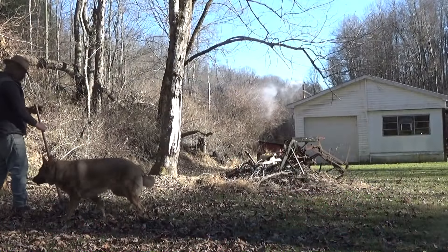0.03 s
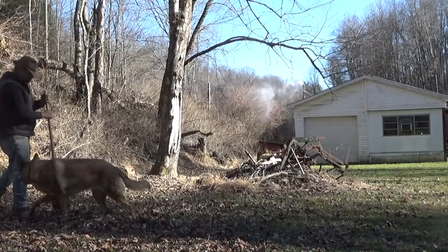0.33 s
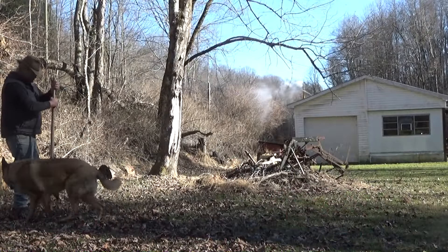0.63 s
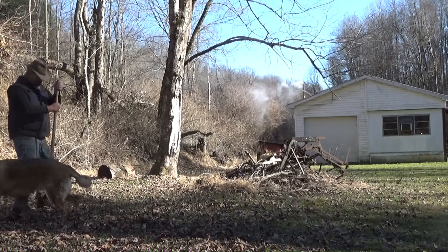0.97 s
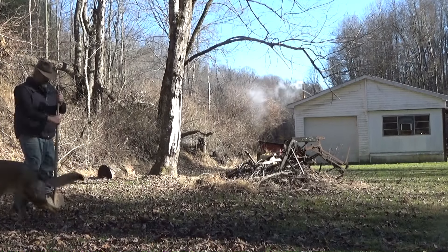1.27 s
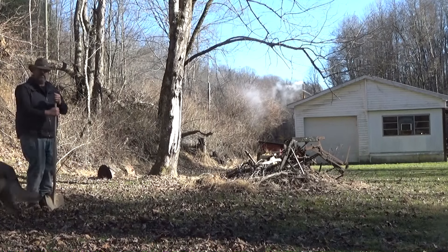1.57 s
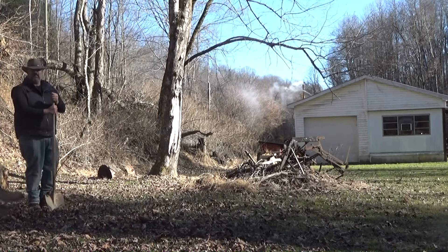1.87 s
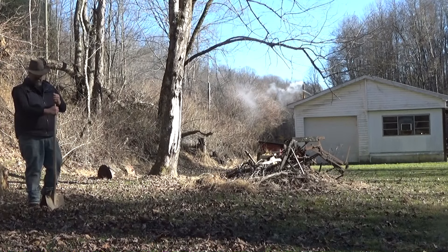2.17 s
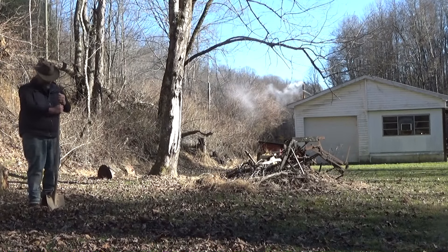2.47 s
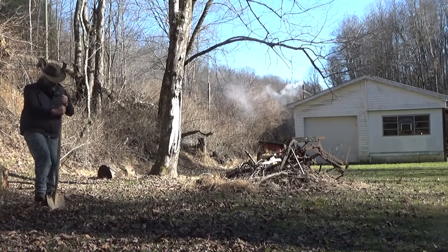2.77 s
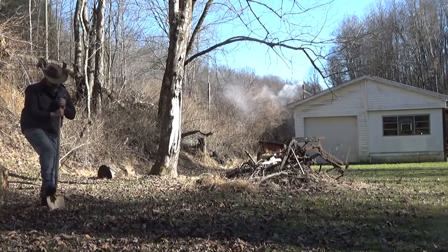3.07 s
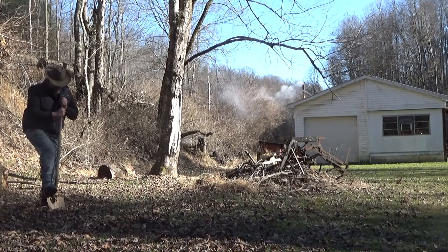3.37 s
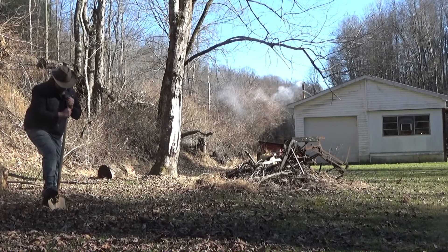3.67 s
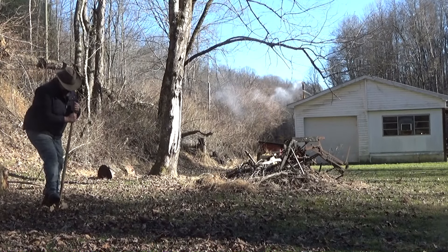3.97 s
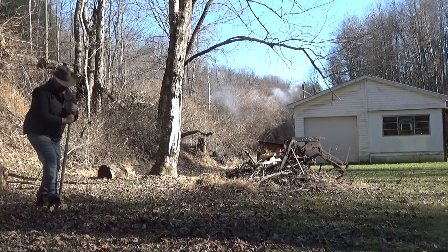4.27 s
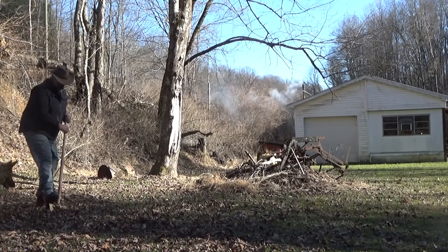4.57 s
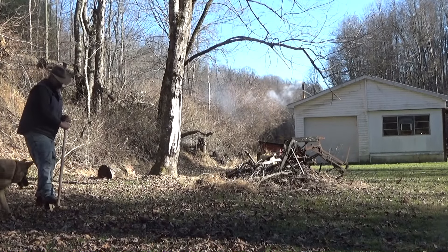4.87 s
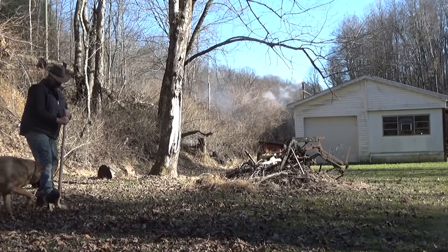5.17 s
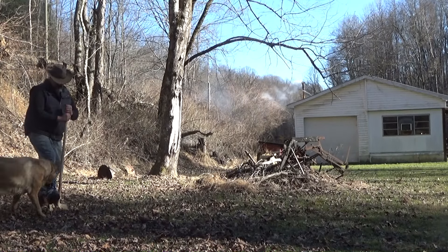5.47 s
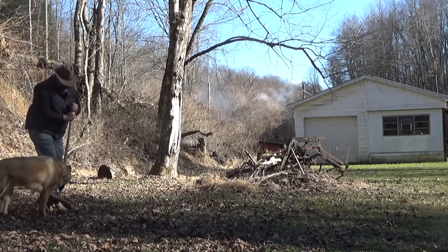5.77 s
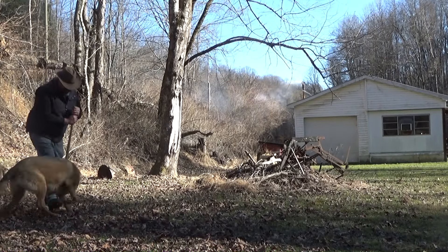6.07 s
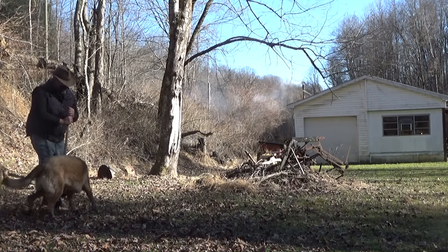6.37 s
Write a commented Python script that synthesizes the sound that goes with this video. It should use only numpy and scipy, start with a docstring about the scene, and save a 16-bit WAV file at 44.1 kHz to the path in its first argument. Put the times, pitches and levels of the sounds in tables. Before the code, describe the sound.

Dry leaves crunch and rustle under a man and a dog, with snapping twigs and two hollow shovel knocks outdoors.

```python
"""Shovel and dog in dry leaves

An open yard, stereo microphone close by. A little to the left a man shuffles about with a shovel while
a dog trots around him. Every step and scrape crumples a swarm of brittle leaves; twigs snap, and twice
the shovel knocks and judders on something hollow. Trees and a shed return a faint echo, and from far
off come a low rumble and a thin whine."""
import sys
import numpy as np
from scipy import signal
from scipy.fft import rfft, irfft, next_fast_len
from scipy.io import wavfile

SR = 44100
rng = np.random.default_rng(int(sys.argv[2]) if len(sys.argv) > 2 else 0)


def unload_audio(sound):
    """Save the sound as a 16-bit wav file, at the path given as the first command line argument."""
    columns = np.transpose(np.atleast_2d(sound))
    # keep every value between -1 and 1, then stretch to whole-number steps
    steps = np.round(np.clip(columns, -1, 1) * 32767)
    wavfile.write(sys.argv[1], SR, steps.astype(np.int16))


N = 287223
T = np.arange(N) / SR

# steps and scrapes through the leaves: (time of full pressure [s], hold [s], level [dB],
# attack [s per 20 dB], release [s per 20 dB], relative litter scuff [dB], relative stem crunch [dB])
SHUFFLES = [(0, 0.02, -37, .09, 0.16, -18, -8), (0.091, .008, -41.5, -0.3, .07, -16, -7.5),
            (0.181, .008, -44.5, .03, 0.23, -13, -8), (0.3, 0.11, -42, 0.1, .1, -12, -7.5),
            (0.446, 0.013, -37.5, 0.05, 0.12, -13.5, -5.5), (0.513, 0.032, -48.5, 0.1, 0.4, -19, -5),
            (0.719, 0.014, -34.5, .05, 0.09, -13, -8.5), (.915, .008, -37.5, .09, 0.03, -16, -11),
            (0.991, .007, -34.5, .055, .16, -14, -7.5), (1.08, .115, -48.5, 0.5, .12, -14.5, -6),
            (1.233, .005, -35, 0.05, .1, -13.5, -6.5), (1.288, .19, -39, 0.17, 0.1, -12, -6.5),
            (1.573, 0.012, -35.5, .1, 0.07, -11.5, -6), (1.68, 0.024, -36, 0.15, .07, -14, -8.5),
            (1.742, 0.01, -32.5, 0.09, .1, -20.5, -6), (1.868, 0.014, -33.5, 0.05, 0.05, -18.5, -5),
            (1.942, .065, -39, .08, .09, -12.5, -5), (2.074, .006, -46.5, -0.1, 0.1, -7.5, -5),
            (2.225, 0.04, -39.5, .14, 0.17, -18, -7.5), (2.508, 0.042, -38.5, .06, 0.05, -13.5, -6),
            (2.629, 0.1, -51.5, 0.4, -0.16, -14, -6.5), (2.883, 0.013, -41.5, .045, 0.1, -15.5, -6),
            (3.033, 0.12, -48, -0.13, 0.22, -14, -5.5), (3.533, 0.072, -51, .1, 0.5, -11.5, -6),
            (3.717, 0.02, -44.5, 0.07, .07, -19, -9), (3.805, 0.042, -43.5, 0.04, 0.05, -16.5, -6.5),
            (3.986, .027, -40, 0.13, 0.04, -15, -6), (4.207, .072, -45.5, 0.2, 0.25, -13, -8.5),
            (4.358, .006, -43.5, -0.08, 0.02, -26, -7), (4.595, .01, -42.5, .22, .17, -13.5, -6.5),
            (4.76, 0.0072, -49.5, .04, 0.2, -11.5, -11), (4.961, 0.012, -36.5, 0.07, 0.11, -13, -7),
            (5.091, 0.015, -34, 0.06, 0.09, -19, -4), (5.176, 0.019, -45, .08, 0.14, -15, -5),
            (5.339, 0.033, -42, 0.08, 0.2, -18, -8.5), (5.718, .077, -47, 0.18, 0.2, -14, -7.5),
            (5.891, .034, -36.5, 0.07, .07, -15.5, -8.5), (5.979, 0.16, -39, 0.09, .04, -15.5, -7),
            (6.17, 0.016, -36, 0.16, .17, -18.5, -9), (6.355, 0.071, -43.5, .08, .14, -16.5, -8.5)]
# dry leaves, close up: (frequency [Hz], level [dB])
LEAF_SPECTRUM = [(300, -25.5), (1200, -13), (1680, -8), (1900, -13), (2400, -7), (3000, -2.5), (3550, -5.5),
                 (5000, -5.5), (5450, -7.5), (8700, -1), (9200, -1.5), (9800, 0), (12500, -13),
                 (15000, -22)]
# the packed litter beneath: (frequency [Hz], level [dB])
LITTER_SPECTRUM = [(80, -31), (220, -6), (370, -2), (600, 3), (1000, 1), (1300, -5.5), (1600, 0.5),
                   (1950, -11.5), (4000, -27)]
# course of the distant rumble: (time [s], level [dB])
RUMBLE_LEVELS = [(0.0, -52), (0.9, -56), (2.15, -52), (2.6, -56), (3.5, -58), (4.2, -56.5), (5.5, -60),
                 (6.51, -57)]
# the rumble as it reaches the yard: (frequency [Hz], level [dB])
RUMBLE_SPECTRUM = [(20, -16), (45, -16.5), (75, -10.5), (105, -6.5), (138, 1), (200, -5.5), (290, -11),
                   (450, -14), (900, -20.5), (1400, -23), (1730, -25), (1900, -25.5), (5000, -25.5),
                   (15000, -48)]
# course of the far-off whine: (time [s], level [dB])
WHINE_LEVELS = [(0, -70), (2.4, -75), (4.3, -77), (4.65, -62.5), (4.95, -76), (5.3, -71), (6.5, -72)]
# snapping twigs and stems: (time [s], peak [dB], pitch [Hz], t60 [s])
SNAPS = [(0.182, -22.5, 2430, 0.034), (.397, -28.5, 7000, .015), (.496, -24.5, 9600, 0.031),
         (0.499, -21, 9700, 0.026), (0.669, -29, 7400, 0.028), (0.754, -28, 8010, .012),
         (0.827, -27, 8160, .014), (1.469, -25, 5000, .012), (1.744, -30, 2800, .04),
         (1.86, -24, 4500, .04), (2.0194, -20, 6400, 0.0088), (2.172, -37, 7000, .012),
         (2.273, -27.5, 8500, 0.013), (3.0206, -31, 2900, 0.04), (3.046, -31.5, 2900, .036),
         (3.082, -29, 6480, 0.016), (3.105, -26.5, 2900, 0.086), (3.117, -20, 8500, 0.014),
         (3.1257, -17.5, 4670, 0.026), (3.1775, -34, 4500, .031), (3.4551, -31, 5000, 0.019),
         (3.4781, -31.5, 5480, 0.061), (4.707, -32, 5500, 0.024), (5.23, -33, 5000, .015),
         (5.2453, -27, 4200, 0.024), (5.6552, -35, 7000, 0.018), (6.161, -21.5, 9000, 0.034),
         (6.380, -24, 5980, 0.023)]
# splintering wood: (frequency [Hz], level [dB])
WOOD_SPECTRUM = [(500, -25), (1800, -15), (2400, -3), (3100, -1.5), (5500, -4.5), (9800, 4.5),
                 (12500, -3.5), (15000, -17)]
# footfalls and taps on the ground: (time [s], peak [dB], rough pitch [Hz], t60 [s])
FOOTFALLS = [(.735, -43, 660, .05), (1.467, -38, 600, 0.041), (1.555, -39, 580, 0.04024),
             (1.622, -38, 214, 0.072), (1.811, -31.5, 800, 0.033), (1.862, -40, 503, 0.029)]
# shovel knocks: (time [s], level [dB], contact [ms], relative ring [dB], relative grit tick [dB],
# judder length [s], first rebound gap [s], fall over the judder [dB])
KNOCKS = [(3.952, -22.5, 0.7336, -5, 6, 0, .015, 0), (3.9736, -16, 1.37, -3, -3.5, 0, .015, 0),
          (3.9896, -24.5, 1.4, 7, -18, 0.029, .0143, 8), (4.0132, -15, 0.18, 10.5, -11.5, 0.034, .018, 18),
          (5.9197, -24, 1.3, -5, -7, .037, .005, 3.5), (5.9783, -35.5, 1.2, -5, -13, .075, .008, 5)]
# modes of the hollow body's dull thud: (frequency [Hz], level [dB], t60 [s])
THUD_MODES = [(212, -18, 0.036), (400, -23.5, 0.008), (545, 9, 0.024), (720, -11, 0.039), (880, -13, 0.032),
              (1400, -24, .015)]
# the body's rough rattle after a blow: (frequency [Hz], level [dB])
RATTLE_SPECTRUM = [(50, -9), (190, -14), (420, 9.5), (620, -1), (700, -12), (830, 9), (1100, -10),
                   (1500, -5.5), (2200, -51)]
# grit under the blade: (frequency [Hz], level [dB])
GRIT_SPECTRUM = [(600, -10), (1600, -3), (1900, 1), (2400, 2.5), (4500, 1), (6000, -12), (8500, 4),
                 (11000, 3.5), (15500, -39)]
# the work lies a little left of the microphone: (frequency [Hz], left minus right [dB])
LEFT_BIAS = [(200, 0), (1000, 1.4), (3300, 1.5), (3900, 0), (4850, 3.5), (5500, 1.5), (7100, 5.5),
             (8200, 1), (15000, .8)]


def undb(db):
    """Decibels to gain."""
    return 10 ** (np.asarray(db) / 20)


def unit(x):
    """Scale to rms 1."""
    return x / np.sqrt(np.mean(x ** 2))


def at_peak(x, db):
    """Scale to a peak level."""
    return undb(db) * x / np.abs(x).max()


def colour(x, spectrum):
    """Filter a sound by a (frequency [Hz], level [dB]) curve."""
    size = next_fast_len(x.shape[-1] + 2048, True)
    hz, db = np.transpose(spectrum)
    bin_db = np.interp(np.log(np.arange(size // 2 + 1) * SR / size + 1), np.log(hz), db)
    return irfft(rfft(x, size) * undb(bin_db), size)[..., :x.shape[-1]]


def fade(t, t60):
    """Exponential decay, 60 dB down after t60."""
    return np.exp(-np.log(1000) * t / t60)


def add(out, s, x):
    """Mix a sound in at time s."""
    i = int(s * SR)
    out[..., i:i + x.shape[-1]] += x[..., :N - i]


def stirring(shortest_s=.02):
    """Foot or blade presses in, holds and lets go: leaf level, and scuff and crunch relative to it (dB)."""
    settling_db = -57.5 + np.array([0, -14, -5.5])  # disturbed leaves keep settling between steps
    power = np.outer(undb(settling_db) ** 2, np.ones(N))
    for s, hold, db, attack, release, scuff_db, crunch_db in SHUFFLES:
        span = slice(*np.searchsorted(T, [s - .5, s + hold + .5]))
        t = T[span] - s
        pressing = np.maximum(-t, 0) / max(attack, shortest_s)
        lifting = np.maximum(t - hold, 0) / max(release, shortest_s)
        pressure = undb(-20 * (pressing + lifting))
        power[:, span] += np.outer(undb(db + np.array([0, scuff_db, crunch_db])), pressure) ** 2
    stir, scuff, crunch = 10 * np.log10(power)
    return stir, scuff - stir, crunch - stir


def crackle(per_s, spread_db, t60, scatter, count):
    """Tiny fractures, many weak and a few strong; each of count leaves has its own ring and place."""
    out, t = np.zeros((2, N)), T[:512]
    for _ in range(count):
        breaks = rng.random(N) < per_s / count / SR
        size = undb(spread_db * np.clip(rng.standard_normal(N), -3, 2.3)[breaks])
        clicks = np.zeros(N)
        clicks[breaks] = size * np.where(np.flatnonzero(breaks) % 2, 1, -1)  # either polarity
        mid, side = rng.standard_normal((2, len(t))) * fade(t, t60)
        ring = unit(np.array([mid + scatter * side, mid - scatter * side]))
        out += signal.oaconvolve(clicks[None], ring, axes=1)[:, :N]
    return out / np.sqrt(per_s)


def flicks(per_s, low_hz, high_hz, t60):
    """Stiff leaves spring free, each with a very short ring of its own pitch."""
    out, t = np.zeros((2, N)), T[:2048]
    for when, pitch, size, place in rng.random((int(per_s * N / SR), 4)):
        hz = low_hz * (high_hz / low_hz) ** pitch
        ring = np.sin(2 * np.pi * hz * t) * fade(t, t60)
        add(out, when * T[-1], size ** 2 * np.outer([1.5 + place, 2.5 - place], ring))
    return unit(out)


def snags(per_s, release_s):
    """Leaves catch and let go: sudden jumps of tension that die away, rms 1."""
    jumps = (rng.random(N) < per_s / SR) * rng.uniform(.26, 1, N)
    tension = signal.lfilter([1], [1, -np.exp(-1 / (release_s * SR))], jumps)
    return unit(tension - tension.mean())


def leaves():
    """Harder stirring breaks more leaves each second; pressing adds stem crunch and a duller scuff."""
    stir_db, scuff_db, crunch_db = stirring()
    per_s = 3400 * undb(.7 * (stir_db + 42))
    breaking = unit(colour(crackle(per_s, spread_db=3.2, t60=.006, scatter=.11, count=14), LEAF_SPECTRUM))
    sliding = unit(colour(crackle(9000, spread_db=-1, t60=.0038, scatter=.11, count=6), LEAF_SPECTRUM))
    springing = flicks(per_s=400, low_hz=2700, high_hz=11500, t60=.055)
    top = unit(breaking + .5 * sliding + undb(-8.5) * springing)
    stems = signal.sosfiltfilt(signal.butter(2, [2000, 5200], "band", fs=SR, output="sos"), top)
    top += (undb(1.29 * (crunch_db + 6.5)) - 1) * stems
    litter = crackle(per_s / 3, spread_db=2.5, t60=.012, scatter=.21, count=8)
    scuff = unit(colour(litter, LITTER_SPECTRUM))
    snag_db = 1.1 * snags(per_s=100, release_s=.011)
    return (undb(-.43) * top + undb(scuff_db - .5) * scuff) * undb(stir_db + snag_db)


def yard_echo(near, wet_db, t60):
    """Trunks and the shed wall scatter a thin, dull echo back to the microphone."""
    t = T[:SR // 2]
    noise = rng.standard_normal((3, len(t))) * fade(t, t60) * (1 - np.exp(-t / .0017))
    echo = noise[0] + .2 * noise[1:]  # mostly shared by both channels
    echo = colour(echo, [(150, -16), (700, -1.5), (3000, -6), (12000, -6.5)])
    return signal.oaconvolve(near, undb(wet_db) * unit(echo) / np.sqrt(len(t)), axes=1)[:, :N]


def distant_rumble(wavers_per_s=9.8):
    """A far-off rumble that wavers slightly; its bass is alike in both channels."""
    db = np.interp(T, *np.transpose(RUMBLE_LEVELS))
    mid, side = colour(rng.standard_normal((2, N)), RUMBLE_SPECTRUM)
    side = colour(side, [(30, -13), (130, -30.5), (400, -9.5), (1200, -.5)])
    waver_db = .305 * np.interp(T * wavers_per_s, np.arange(4096), rng.standard_normal(4096))
    return unit(np.array([mid + side, mid - side])) * undb(db + 2.5 + waver_db)


def distant_whine(hz, width_hz):
    """A narrow band of noise, heard as a thin, unsteady tone from far away."""
    db = np.interp(T, *np.transpose(WHINE_LEVELS))
    band = signal.butter(2, [hz - width_hz / 2, hz + width_hz / 2], "band", fs=SR, output="sos")
    return unit(signal.sosfilt(band, rng.standard_normal(N))) * undb(db)


def twigs():
    """A sharp crack around the twig's own pitch, followed by splintering fibres."""
    out, t = np.zeros((2, N)), T[:4096]
    for s, db, hz, t60 in SNAPS:
        envelope = fade(t, .0014) + .5 * fade(t, t60) + .12 * fade(t, .1)
        mid, side = rng.standard_normal((2, len(t))) * envelope
        resonance = [(hz / 6, -28), (hz / 2, -6), (hz, 0), (hz * 1.35, -5), (hz * 3, -15)]
        crack = colour(np.array([mid + .1168 * side, mid - .16 * side]), resonance)
        add(out, s, at_peak(colour(crack, WOOD_SPECTRUM), db))
    return out


def footfalls():
    """Short dead thumps of weight meeting the soil."""
    out, t = np.zeros(N), T[:4096]
    for s, db, hz, t60 in FOOTFALLS:
        soil = [(hz / 4, -24), (hz / 1.2, -3), (hz * .76, 0), (hz * 2, -14), (hz * 5, -40)]
        thump = colour(rng.standard_normal(len(t)) * fade(t, t60), soil)
        add(out, s, at_peak(thump, db))
    return out


def blows(slowing=1.1, uneven=.25, softening_ms=1.2, rebound_ring_db=-5, rebound_tick_db=-9):
    """Each knock and its judder: the blade rebounds ever more softly, at uneven, widening gaps."""
    for s, db, contact_ms, ring_db, tick_db, judder_s, gap_s, fall_db in KNOCKS:
        yield s, db, contact_ms, ring_db, tick_db
        stray = np.exp(uneven * rng.uniform(-1, 1, 16))
        delays = np.cumsum(gap_s * stray * slowing ** np.arange(len(stray)))
        for delay in delays[delays < judder_s]:
            spent = delay / judder_s
            softer_ms = contact_ms + softening_ms * spent
            yield s + delay, db - fall_db * spent, softer_ms, rebound_ring_db, rebound_tick_db


def shovel_knocks(ring_hz=612):
    """The blade pushes a hollow body, the longer the duller; the body rattles and grit ticks."""
    out, t = np.zeros((2, N)), T[:8192]
    thud = sum(undb(db) * np.sin(2 * np.pi * hz * t) * fade(t, t60) for hz, db, t60 in THUD_MODES)
    # most of the ring dies at once, a faint part lingers
    ring = np.sin(2 * np.pi * ring_hz * t) * (fade(t, .095) + undb(-33) * fade(t, .399))
    radiation = signal.butter(2, 170, "high", fs=SR, output="sos")  # a small body gives off little bass
    for s, db, contact_ms, ring_db, tick_db in blows():
        push = np.sin(np.pi * np.minimum(1000 * t / contact_ms, 1))
        response = thud + undb(ring_db) * ring  # a pressed contact thuds, a free one rings
        body = signal.sosfilt(radiation, signal.fftconvolve(response, push)[:len(t)])
        rattle = colour(rng.standard_normal((2, len(t))) * fade(t, .11), RATTLE_SPECTRUM)
        tick_envelope = fade(t, .018) + .083 * fade(t, .14)
        tick = colour(rng.standard_normal((2, len(t))) * tick_envelope, GRIT_SPECTRUM)
        mid, side = at_peak(rattle, -12.5) + at_peak(tick, tick_db)
        mid += at_peak(body, 0)
        add(out, s, undb(db) * np.array([mid + .2028 * side, mid - .067 * side]))
    return out


def scene():
    """The work close by and a little to the left, the yard around it, rumble and whine far behind."""
    left, right = leaves() + twigs() + footfalls() + shovel_knocks()
    left = colour(left, [(hz, db / 2) for hz, db in LEFT_BIAS])
    right = colour(right, [(hz, -db / 2) for hz, db in LEFT_BIAS])
    near = np.array([left, right])
    echo = yard_echo(near, wet_db=-18.5, t60=.6)
    return near + echo + distant_rumble() + distant_whine(hz=1683, width_hz=100)


def record(dry):
    """The recorder cuts the top steeply above 15750 Hz."""
    return signal.sosfilt(signal.ellip(10, .2, 70, 15750, fs=SR, output="sos"), dry)


dry = scene()
out = record(dry)
unload_audio(out)
```